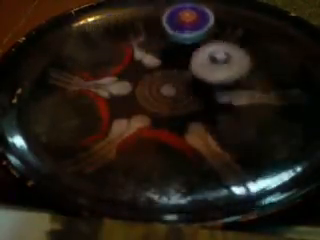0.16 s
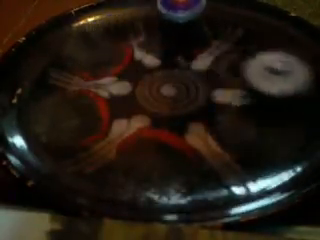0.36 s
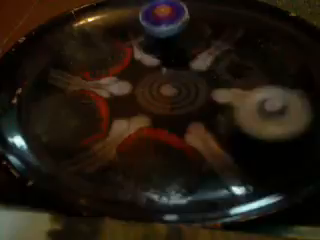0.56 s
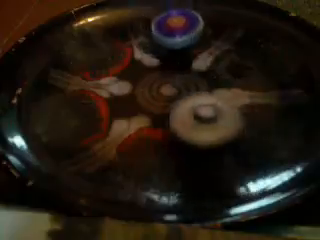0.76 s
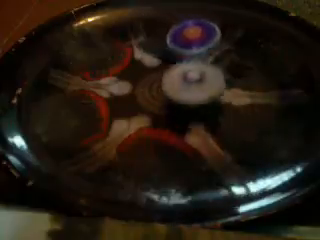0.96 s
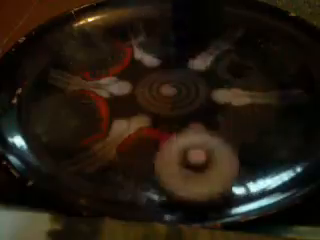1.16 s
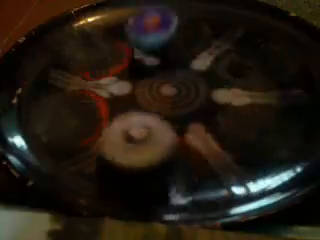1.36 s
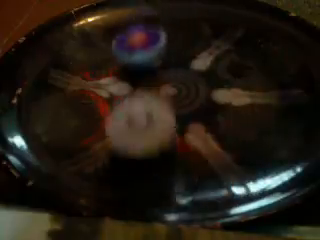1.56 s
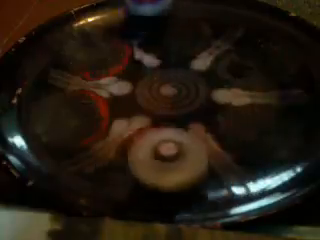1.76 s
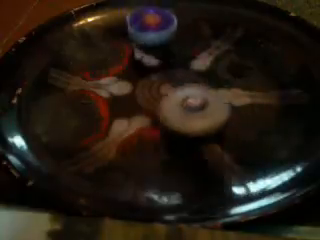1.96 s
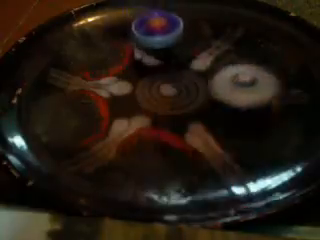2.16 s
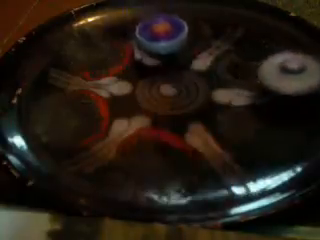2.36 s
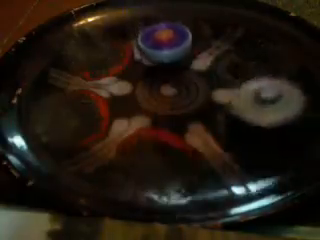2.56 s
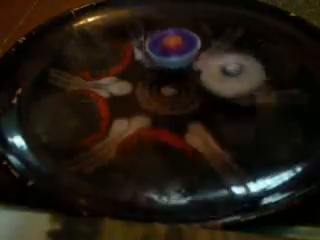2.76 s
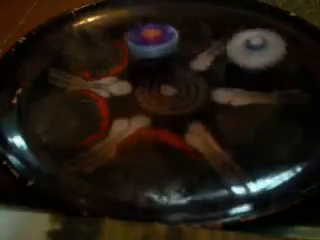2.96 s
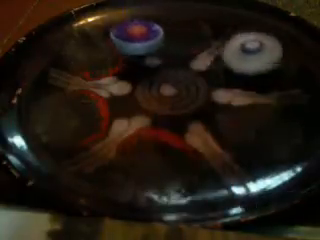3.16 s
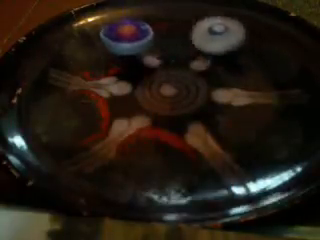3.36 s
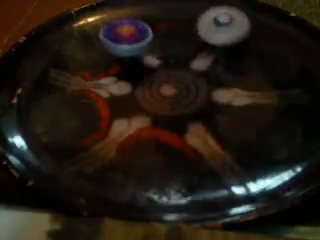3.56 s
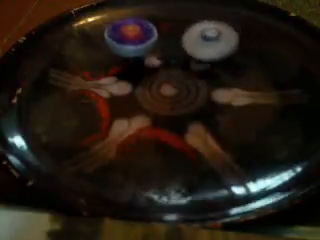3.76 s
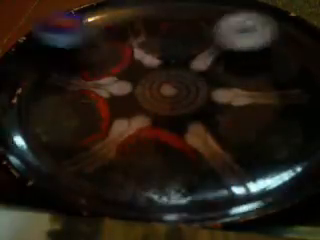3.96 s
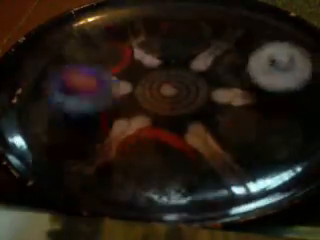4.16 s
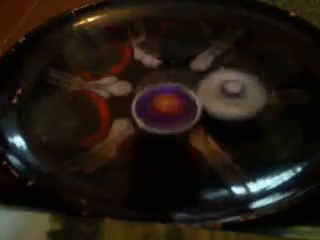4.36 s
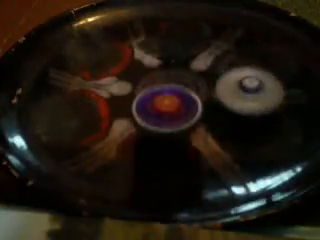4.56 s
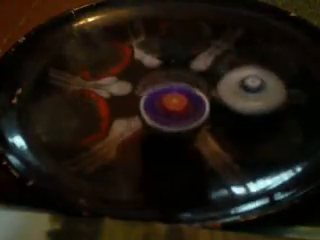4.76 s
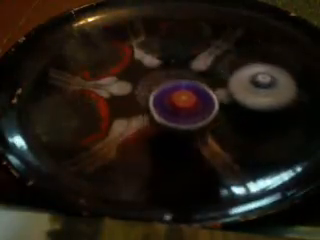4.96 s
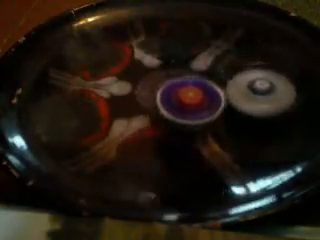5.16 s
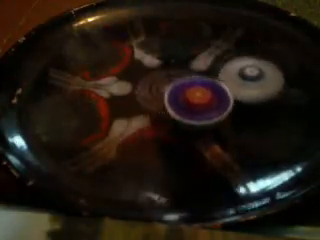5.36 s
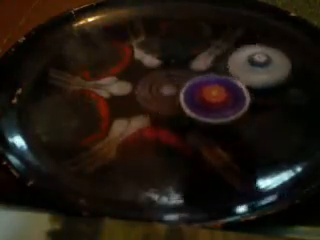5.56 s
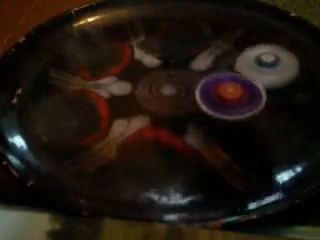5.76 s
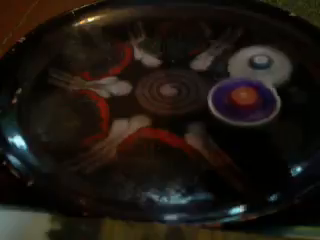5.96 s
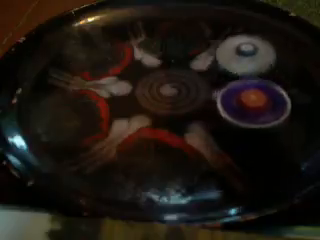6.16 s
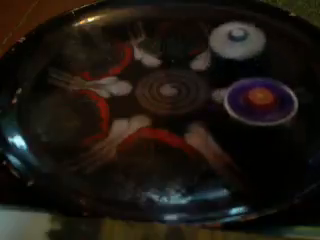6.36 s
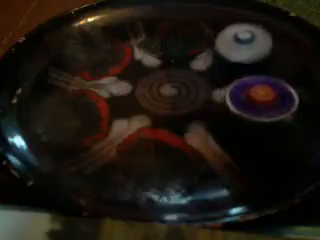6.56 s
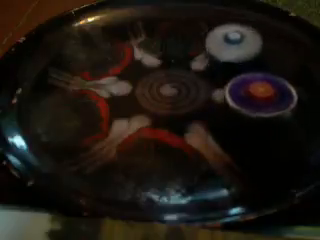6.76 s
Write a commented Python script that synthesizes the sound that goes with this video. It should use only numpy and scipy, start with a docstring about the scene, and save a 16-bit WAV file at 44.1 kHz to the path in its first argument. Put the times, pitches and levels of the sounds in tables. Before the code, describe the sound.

Two toy spinning tops roll around a thin plastic bowl, their tips chattering and scraping while its floor hums. Their rims clack and grind together in several sharp flurries, with brief rattles in between. After the loudest clash they slow down, leaving light, uneven taps over a faint hum. The small room echoes slightly, and the microphone sounds narrow, clipping on the hardest hits.

```python
"""In a small room, two toy spinning tops roll in a thin plastic bowl. Their tips chatter on it and
make its floor hum; their rims clack and grind together. These contacts ring the bowl and the tops'
shells. As the tops slow down, only light taps are left. The room echoes over a faint steady hush,
and a microphone with a narrow range clips the hardest clashes."""
import sys
import numpy as np
from scipy import signal
from scipy.fft import rfft, irfft, next_fast_len
from scipy.io import wavfile
from scipy.ndimage import map_coordinates

SR = 44100
rng = np.random.default_rng(int(sys.argv[2]) if len(sys.argv) > 2 else 0)


def int16_out(signal):
    """Quantize to a 16-bit WAV file."""
    q = np.round(np.clip(np.atleast_2d(signal).T, -1, 1) * 32767)
    wavfile.write(sys.argv[1], SR, q.astype(np.int16))


N = 300762

# The notes (modes) of the bowl and of four shells. Each row: pitch in Hz, width in Hz, level in dB.
BOWL_MODES = [(69.24, 110, -13), (260, 194.6, -6), (428.4, 148, -1.5), (621.4, 80, 1), (738.8, 94, -1.5),
              (887.7, 153, -4)]
UPPER_MODES = [(2548, 200, -7), (2816, 80, 3), (2915, 140, -2), (3374, 180, -12), (3712, 160, -14)]
TIP_MODES = [(1470, 110, -8), (1640, 110, 0), (2340, 80, -2)]
MIDDLE_MODES = [(1895, 35, -6), (1950, 32, -1), (2115, 32, -3)]
LOW_MODES = [(1095, 60, -6), (1165, 30, 0), (1360, 160, -11)]
SHELLS = [UPPER_MODES, TIP_MODES, MIDDLE_MODES, LOW_MODES]
# Runs of light touches. Each row: start and length in seconds, level in dB, pitch in Hz,
# dB added for the bowl.
RATTLES = [(0.34, 0.161, -31.5, 2602, -5.5), (2.131, 0.0704, -37, 1633, 1.5),
           (2.254, 0.1674, -26.5, 2833, 0), (2.559, 0.1185, -32, 2242, -4.5), (3.101, 0.153, -31, 2340, -3),
           (3.276, 0.0512, -41, 2965, 4.5), (3.385, 0.056, -30.5, 2726, -14.5),
           (4.106, 0.0363, -18, 2863, -10), (4.238, 0.094, -25.5, 1997, -7)]
# Single taps of the slowing tops. Each row: start in seconds, level in dB, pitch in Hz,
# dB added for the bowl.
TAPS = [(4.617, -35.5, 2700, -30), (4.6279, -24.5, 1674, -24.5), (4.6612, -25, 1220, -26),
        (4.693, -28, 1211, -21.5), (4.7369, -27, 2270, -19.5), (4.7702, -29, 2687, -8),
        (4.9017, -27, 1623, -6.5), (4.935, -26.5, 1657, -3.5), (4.9724, -24.5, 2381, -10.5),
        (5.015, -27, 2385, -7), (5.0515, -34, 2516, -2), (5.1486, -28.5, 1934, -4.5),
        (5.1636, -29, 2365, -5.5), (5.175, -23.5, 1630, -12.5), (5.2591, -29, 2438, -8),
        (5.3284, -26.5, 1782, -15), (5.393, -34, 2924, -4.5), (5.4603, -29.5, 1615, -4.5),
        (5.4951, -35.5, 2820, -17), (5.5098, -30.5, 2330, -19), (5.5763, -44.5, 2850, 4),
        (5.619, -26, 2756, -8), (5.6562, -30.5, 2838, -19.5), (5.7269, -29.5, 2305, -10),
        (5.7775, -25.5, 2747, -25.5), (5.825, -32.5, 2738, -23.5), (5.8589, -31.5, 1633, -5.5),
        (5.8911, -28.5, 1650, -4.5), (5.926, -29, 1640, -7), (5.9751, -26.5, 2846, -19.5),
        (5.9968, -33, 1634, -4), (6.0098, -25, 2362, -16.5), (6.0443, -23, 2843, -26.5),
        (6.0757, -31.5, 2833, -8.5), (6.1151, -29.5, 2780, -8), (6.1504, -28.5, 2809, -5.5),
        (6.2212, -38, 2894, -5), (6.3679, -34.5, 2887, 0.5), (6.4033, -38.5, 2896, 1.5),
        (6.4752, -40, 2855, -4), (6.5844, -29.5, 2720, -16), (6.6153, -39, 2920, 3),
        (6.6613, -32, 2820, -6.5)]
OFF_PITCH_DB = 14  # how much less a shell rings far from the pitch struck


def amp(db):
    """Turn decibels into a gain."""
    return 10 ** (np.asarray(db) / 20)


def unit(x):
    """Scale x to an average power of 1."""
    return x / np.sqrt(np.mean(x ** 2) + 1e-20)


def along(points, hz):
    """Read between (Hz, value) points on a log scale."""
    f, v = np.transpose(points)
    return np.interp(np.log(hz + 1), np.log(f + 1), v)


def curves(rows):
    """Give one value per sample for each column after the time."""
    times, *columns = np.transpose(rows)
    return [np.interp(np.arange(N) / SR, times, column) for column in columns]


def wobble(per_s):
    """A smooth curve through per_s random values a second."""
    return map_coordinates(rng.standard_normal(int(N * per_s / SR) + 4), [np.arange(N) * per_s / SR])


def filtered(x, response):
    """Multiply each frequency in x by response(Hz)."""
    size = next_fast_len(N + SR // 2)
    return irfft(rfft(x, size) * response(np.fft.rfftfreq(size, 1 / SR)), size)[..., :N]


def spells(start, hold, fade_s):
    """Each spell of rubbing starts at once, holds, then falls 60 dB in fade_s."""
    since = np.arange(N) / SR - start[:, None]
    return (since > 0) * amp(-60 * np.maximum(since - hold[:, None], 0) / fade_s)


def ring(force, modes, snap_db):
    """Pushed plastic rings at its modes; one extra, very wide mode is its dry snap."""
    centre = np.mean(modes, axis=0)[0]
    modes = modes + [(centre, centre / 2, snap_db)]

    def body(f):
        return sum((-1) ** k * amp(db) * 1j * f * width / (hz * hz - f * f + 1j * f * width)
                   for k, (hz, width, db) in enumerate(modes))
    return filtered(force, body) / np.abs(filtered(signal.unit_impulse(N), body)).max()


def shell_levels(db, pitch_hz, loss_db=OFF_PITCH_DB):
    """Each shell's level in dB: full if it has a mode at the pitch struck, weaker further away."""
    octaves = np.array([np.abs(np.log2(np.array(modes)[:, :1] / pitch_hz)).min(axis=0)
                        for modes in SHELLS])
    return db - loss_db * np.tanh(octaves / 0.13)


def chatter(per_s, spread_db, turn_db, drift_db):
    """The tips make tiny uneven contacts, pressed harder once each turn."""
    # The slowing wobble of the tips. Each row: time in seconds, turns per second.
    spin = [(0, 38), (6.82, 28)]
    size = rng.standard_normal(N) * amp(spread_db * np.minimum(rng.exponential(size=N), 3))
    turn = np.cos(2 * np.pi * np.cumsum(curves(spin)[0] * (1 + 0.09325 * wobble(5.4))) / SR)
    contacts = rng.random(N) < per_s / SR
    return unit(contacts * size * amp(turn_db * turn + drift_db * (wobble(17) + wobble(5.45))))


def floor_hum():
    """Friction makes the bowl's floor hum; the pitch drifts as the tops wander."""
    # Each row: pitch in Hz, random changes per second, level in dB.
    floor_notes = [(255.2, 72, -2), (408.44, 55, -1)]
    flutter = amp(1.9 * wobble(18))
    hum = 0
    for hz, per_s, db in floor_notes:
        gain = amp(db + 1.8 * wobble(6.6))
        phase = 2 * np.pi * np.cumsum(hz * (1 + 0.018 * wobble(2.5))) / SR
        hum += gain * unit(wobble(per_s) * np.cos(phase) + wobble(per_s) * np.sin(phase))
    return unit(flutter * hum)


def rolling():
    """Dragging tips make the floor hum, the wall scrape and the shells shiver, more so as rims grind."""
    # Each row: time in seconds, then levels in dB for floor, wall, three lower shells, upper shell.
    roll_levels = [(0.0, -42.5, -43.5, -44.5, -43.5), (0.23, -36.5, -41, -37.5, -50.5),
                   (0.4, -46.5, -36, -54, -40.5), (0.76, -41.5, -40, -52, -50.5),
                   (0.99, -40, -40.5, -36.5, -67), (1.12, -56.5, -41.5, -33, -28.5),
                   (1.41, -41.5, -48.5, -44.5, -52), (1.69, -52.5, -40, -36.5, -50.5),
                   (1.9, -39, -44.5, -39, -40), (2.05, -44, -55.5, -47.5, -48.5),
                   (2.35, -41, -43, -44, -47.5), (2.66, -48.5, -56, -50.5, -49.5),
                   (3.04, -40.5, -40, -48.5, -46), (3.46, -54.5, -57, -51.5, -50),
                   (3.68, -42, -42.5, -46, -40.5), (3.82, -35.5, -39.5, -42.5, -38),
                   (4.03, -42, -37.5, -33, -42.5), (4.27, -43, -30, -37.5, -42),
                   (4.42, -53.5, -69, -30, -62.5), (4.71, -70.5, -57.5, -76, -63),
                   (5.07, -57, -56.5, -58.5, -52), (5.53, -44.5, -57, -53.5, -55.5),
                   (5.98, -63.5, -57.5, -80, -51), (6.19, -51.5, -59.5, -63.5, -60),
                   (6.44, -55.5, -56, -69, -63), (6.82, -63.5, -67, -60.5, -56.5)]
    # The dB added to that level for each shell, in the order of SHELLS.
    shell_trims = [-4, -3.5, -7.5, -14]
    # Grinding rims. Each row: start and hold in seconds, level in dB, pitch in Hz, dB added for the bowl.
    grinds = [(0.055, 0.1, -51.5, 1165, -9), (0.217, 0.0457, -23, 1920, -9), (0.432, 0.11, -40.5, 2780, -1),
              (0.579, 0.12, -48, 1950, -9), (0.733, 0.083, -44.5, 1950, -15),
              (0.847, 0.033, -43, 1165, -14), (0.943, 0.305, -27.5, 1097, -6),
              (0.946, 0.44, -28, 3300, -14.5), (1.48, 0.027, -18.5, 2086, -12),
              (1.551, 0.32, -35, 2840, -6), (1.921, 0.1045, -30, 1950, -9), (2.81, 0.07, -20, 1150, -11),
              (3.625, 0.088, -43.5, 1951, 5), (3.82, 0.125, -15.5, 2009, -13),
              (3.961, 0.0399, -7, 2115, -14.5), (3.953, 0.026, -8, 2915, -15.5)]
    hum_db, scrape_db, lower_db, upper_db = curves(roll_levels)
    start, hold, grind_db, grind_hz, wall_db = np.transpose(grinds)
    grind = spells(start, hold, fade_s=0.12)
    grind_gains = amp(shell_levels(grind_db, grind_hz)) @ grind

    # Light touches drag too, rubbing the floor and scuffing the shells.
    tap_drag_s = 0.0169
    light_rows = np.vstack([RATTLES, np.insert(TAPS, 1, tap_drag_s, axis=1)])
    start, hold, touch_db, touch_hz, bowl_db = light_rows.T
    drag = spells(start, hold, fade_s=0.075)
    rub = amp(touch_db + bowl_db - 7.5) @ drag
    scuffs = amp(shell_levels(touch_db - 27, touch_hz)) @ drag
    floor = (amp(hum_db) + rub) * floor_hum()
    shared = chatter(per_s=1000, spread_db=4, turn_db=8, drift_db=7)

    def shiver(modes):
        """One part rings with the shared chatter plus its own."""
        own = chatter(per_s=750, spread_db=4, turn_db=4, drift_db=2)
        return unit(ring(shared + 2.86 * own, modes, snap_db=-19))

    shells = 0
    for k, roll_db in enumerate([upper_db] + 3 * [lower_db]):
        tilt_db = 5 * wobble(7)  # each shell comes and goes as the tops tilt
        shells += (amp(roll_db + shell_trims[k] + tilt_db) + grind_gains[k] + scuffs[k]) * shiver(SHELLS[k])
    wall = (amp(scrape_db) + amp(grind_db + wall_db) @ grind) * shiver(BOWL_MODES)
    return floor + wall + shells


def blows(hardness, t):
    """The force of each contact: brief when hard, longer when light, then small gritty rebounds."""
    age = t / (0.0028 * (1 - hardness) + 0.0011 * hardness)
    push = age * np.exp(-age) * rng.standard_normal(age.shape)
    push /= np.linalg.norm(push, axis=1, keepdims=True)
    bounces = rng.random(age.shape) < 700 / SR  # about 700 a second
    rebounds = bounces * rng.standard_normal(age.shape) * amp(-60 * t / 0.1364)
    click = (0.021 + 0.55 * hardness) * signal.unit_impulse(len(t))
    return 0.768 * (1 - 0.699 * hardness) * push + click + 0.327 * rebounds


def clacks():
    """Clashes and touches crack and ring the shells; hard ones also ring the bowl's wall, light ones its floor."""
    # Rim hits rim. Each row: start in seconds, level in dB, pitch in Hz, dB added for bowl and for crack.
    clashes = [(0.189, -18, 1636, -21, -5), (0.216, -8.5, 2475, -28.5, 9), (0.223, -10.5, 1906, -16.5, -10),
               (0.234, -8, 2901, -10.5, -12.5), (0.314, -16.5, 2485, -8.5, -16.5),
               (0.362, -25, 3286, -16, -6), (0.488, -15.5, 1517, -4.5, 1.5), (0.741, -22.5, 1241, -14, 4),
               (0.944, -5.5, 2596, -21, 10), (0.981, -1, 2846, -19, -18.5), (0.997, -8, 2832, -20.5, -4.5),
               (1.026, -11, 2810, -2, -6.5), (1.062, -9, 2767, -16, -6), (1.091, -3, 2309, -15, 2.5),
               (1.099, -12.5, 2025, -11.5, 7), (1.114, -9.5, 1168, -7.5, -11.5),
               (1.159, -2, 2670, -16.5, -2.5), (1.19, -13.5, 1130, -9.5, -14.5),
               (1.238, -8.5, 2902, -4.5, -10.5), (1.278, -8.5, 1920, -20, 8.5),
               (1.292, -11.5, 3403, -12.5, -4), (1.319, -4.5, 1906, -17.5, -1.5),
               (1.4805, -1.5, 1573, -12.5, 6.5), (1.487, -1, 1112, -19, 1), (1.509, -10, 2140, -26, -11.5),
               (1.526, -5, 3572, -10, -5), (1.541, -7.5, 1963, -14.5, -5), (1.549, -21.5, 606, 4.5, -16.5),
               (1.554, -2.5, 2794, -23, -11.5), (1.61, -22.5, 600, 4.5, -15.5),
               (1.642, -19, 2824, -3.5, -2.5), (1.657, -7, 910, -9.5, -11.5), (1.684, -8, 856, -8.5, -6),
               (1.702, -6, 1046, -23.5, -3), (1.738, -16, 1111, -1, -15.5), (1.991, -24, 3117, -23, 0.5),
               (2.0005, -10, 3241, -24, 13), (2.617, -23, 1654, -31, -6.5), (2.771, -4.5, 1134, -10, 1.5),
               (2.811, -6.5, 935, -18.5, 0.5), (2.817, 0.5, 1129, -18, 1.5), (2.842, -8, 1130, -9, 7),
               (2.873, -11.5, 1903, -20, -14), (3.071, -25, 2837, -4, -11.5),
               (3.181, -20.5, 2891, -19.5, -29.5), (3.235, -26, 2757, -0.5, -8.5),
               (3.452, -18.5, 2613, -8.5, 4.5), (3.651, -11, 1267, -19, -1.5),
               (3.686, -20.5, 1890, -5, -19), (3.822, -6, 2127, -22.5, -5.5),
               (3.834, -2.5, 2175, -26, -11.5), (3.856, -2, 1926, -6, 8.5), (3.953, -3, 2685, -12, -4.5),
               (3.97, 2.5, 2637, -21.5, -9), (3.984, 0.5, 1952, -20.5, -9), (4.012, -3, 1904, -20, -13),
               (4.168, -18, 1146, -7, -12), (4.318, -9, 2545, -20.5, 9), (4.412, -11.5, 2838, -12.5, -16)]
    # The dry crack of the rims. Its one row: pitch in Hz, width in Hz, level in dB.
    crack_mode = [(2836.2, 1104.7, 4)]
    t = np.arange(SR // 12) / SR
    start, level_db, pitch_hz, bowl_db, crack_db = np.vstack([clashes, touches()]).T
    hardness = np.clip((level_db[:, None] + 35.5) / 25, 0, 1)
    samples = np.round(start * SR).astype(int)[:, None] + np.arange(len(t))

    def place(sounds):
        return np.bincount(samples.ravel(), sounds.ravel(), N + SR)[:N]

    def force(db, share):
        return place(share * amp(db)[:, None] * blows(hardness, t))

    scatter_db = 3 * rng.standard_normal((len(start), len(SHELLS))).T
    loss_db = OFF_PITCH_DB + 6 * (1 - hardness[:, 0]) + scatter_db
    shells = sum(ring(force(db, 0.8), modes, snap_db=-17)
                 for db, modes in zip(shell_levels(level_db, pitch_hz, loss_db), SHELLS))
    crack = ring(np.bincount(samples[:, 0], amp(level_db + crack_db), N), crack_mode, snap_db=-3.5)
    wall = ring(force(level_db + bowl_db, 1.564 * np.sqrt(hardness)), BOWL_MODES, snap_db=-6)
    floor = ring(force(level_db + bowl_db, 2.455 * np.sqrt(1 - hardness)), BOWL_MODES[1:4], snap_db=-34)
    # The struck spot rings briefly at its own pitch.
    rise = np.tanh(t / (0.001 * (1.05 - hardness)))
    fade = amp(level_db[:, None] - 3.5 - 60 * t / 0.033)
    spot = place(rise * fade * np.sin(2 * np.pi * pitch_hz[:, None] * t))
    return spot + crack + shells + wall + floor


def touches():
    """List the light contacts like clashes: one per turn in each rattle, then the single taps."""
    turn_s, scatter_s, scatter_db, crack_db = 0.035, 0.00194, 3, -20
    turns = np.arange(8)
    start, length, db, pitch_hz, bowl_db = np.transpose(RATTLES)[:, :, None] + np.zeros(len(turns))
    times = start + turn_s * turns + scatter_s * np.sign(turns) * rng.standard_normal(start.shape)
    db = db + scatter_db * rng.standard_normal(start.shape)
    rattles = np.stack([times, db, pitch_hz, bowl_db], axis=-1)[turn_s * turns <= length]
    return np.pad(np.vstack([rattles, TAPS]), ((0, 0), (0, 1)), constant_values=crack_db)


def room_echo(x):
    """The room answers a moment later; its low notes last longest."""
    # Each row: frequency in Hz, seconds to fade by 60 dB.
    fade_times = [(200, 0.89), (1500, 0.19), (4000, 0.24)]
    hz, t, noise = signal.stft(rng.standard_normal(SR // 2), SR, nperseg=256)
    tail = signal.istft(noise * amp(-60 * t / along(fade_times, hz)[:, None]), SR, nperseg=256)[1]
    return signal.fftconvolve(np.pad(x, (300, 0)), tail / np.linalg.norm(tail))[:N]


def room_tone():
    """The room's steady, low hush."""
    # Each row: frequency in Hz, relative level in dB.
    colour = [(25, -29.5), (276, 0.5), (1250, -24.5), (2850, -23), (4400, -47.5), (5720, -99), (9680, -120)]
    return unit(filtered(rng.standard_normal(N), lambda hz: amp(along(colour, hz))))


def scene():
    """Mix the tops, their echo and the room tone."""
    tops = rolling() + clacks()
    return (tops + amp(-11) * room_echo(tops) + amp(-64) * room_tone())[None]


def record(dry):
    """The microphone loses deep bass and treble; clipping adds new treble, whose very top is cut."""
    # Each row: frequency in Hz, gain in dB.
    microphone = [(20, -18.5), (100, -3), (300, -3.5), (3300, -0.5), (3800, -5.5), (4300, -15), (4800, -48),
                  (5300, -110)]
    ceiling, top_hz, edge_hz = 0.72, 15900, 300
    narrow = filtered(dry, lambda hz: amp(along(microphone, hz)))
    clipped = narrow / (1 + (narrow / ceiling) ** 24) ** (1 / 24)
    return filtered(clipped, lambda hz: np.clip((top_hz - hz) / edge_hz, 0, 1) ** 2)


dry = scene()
out = record(dry)
int16_out(out)
```